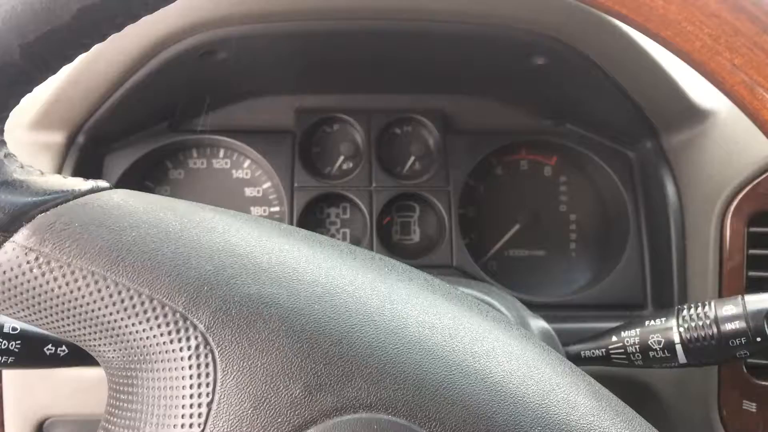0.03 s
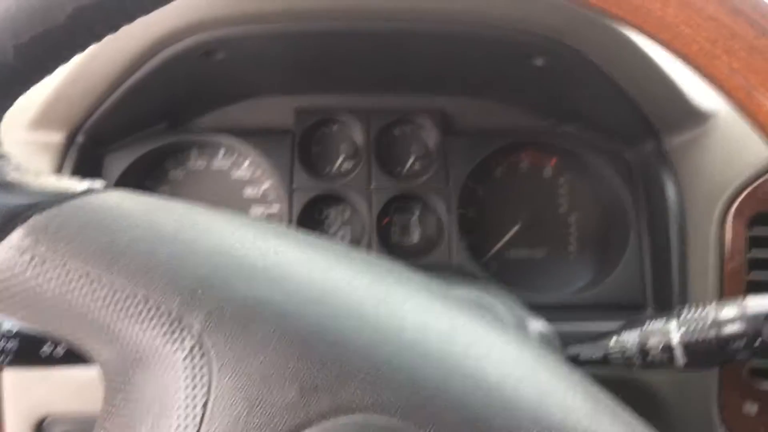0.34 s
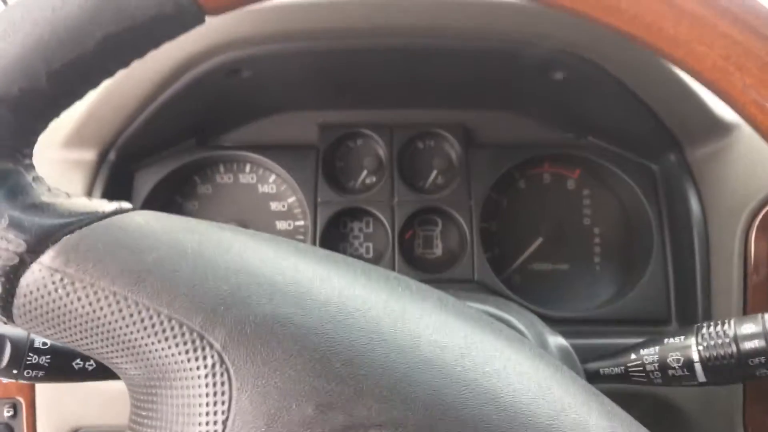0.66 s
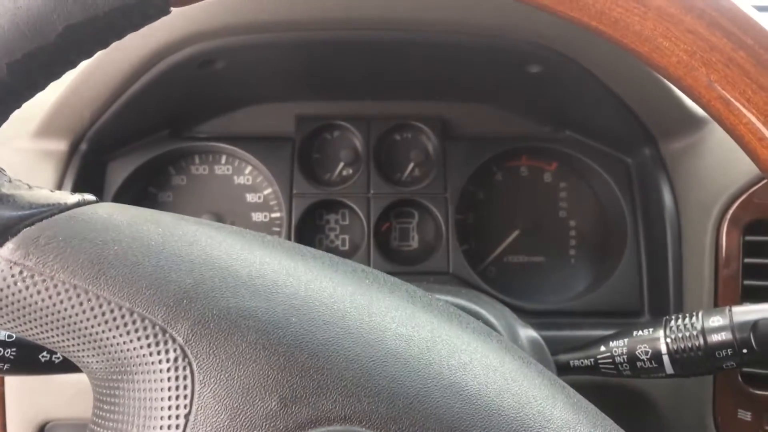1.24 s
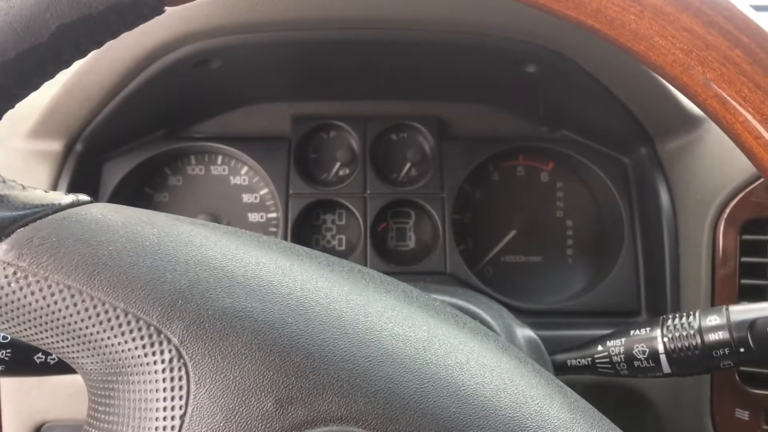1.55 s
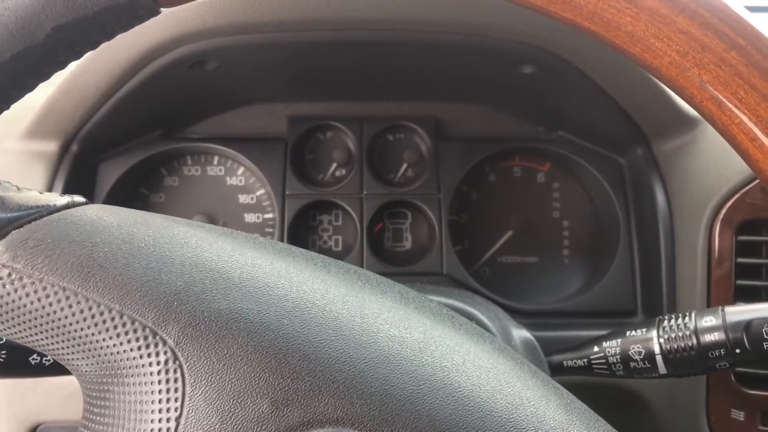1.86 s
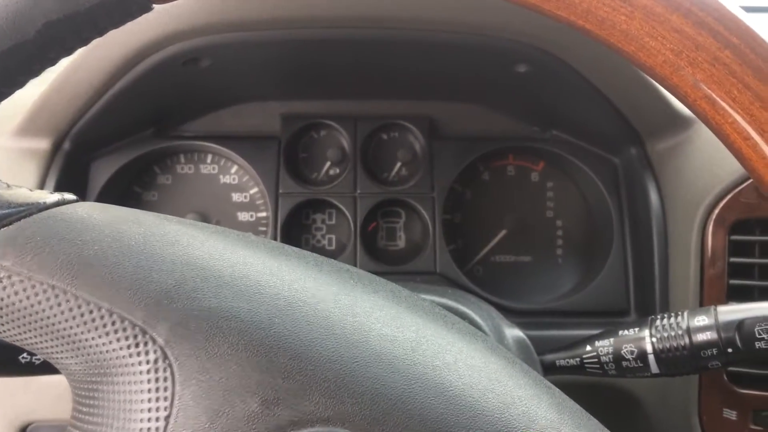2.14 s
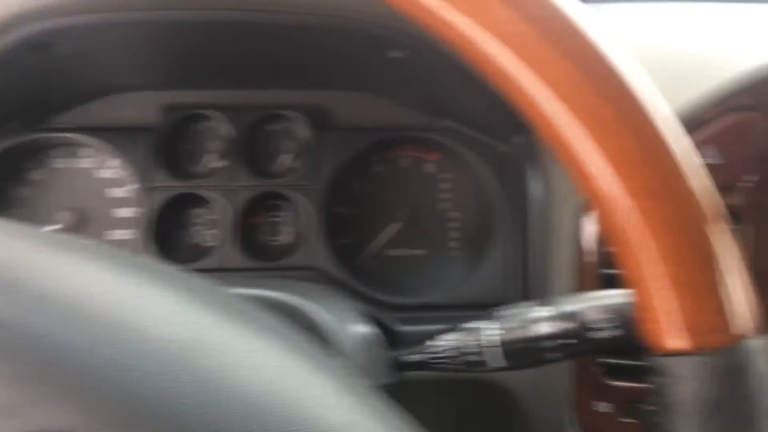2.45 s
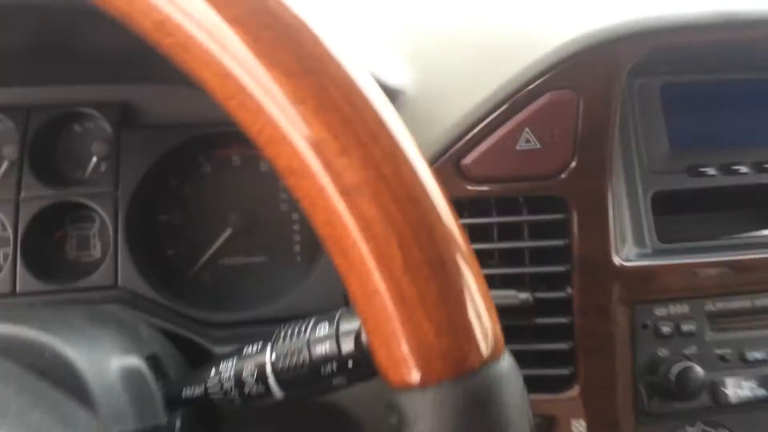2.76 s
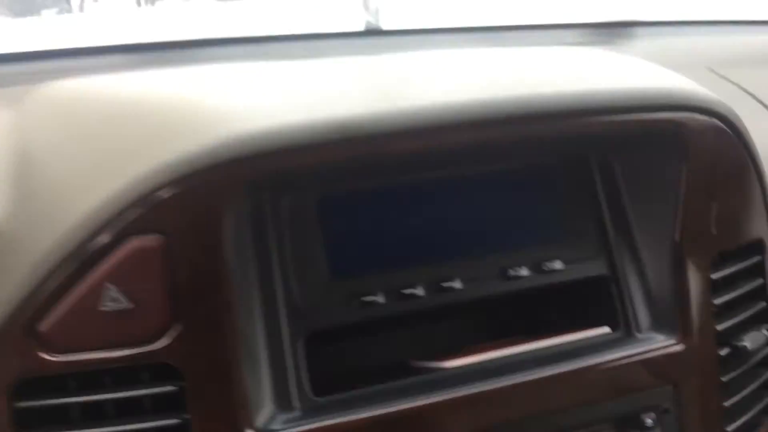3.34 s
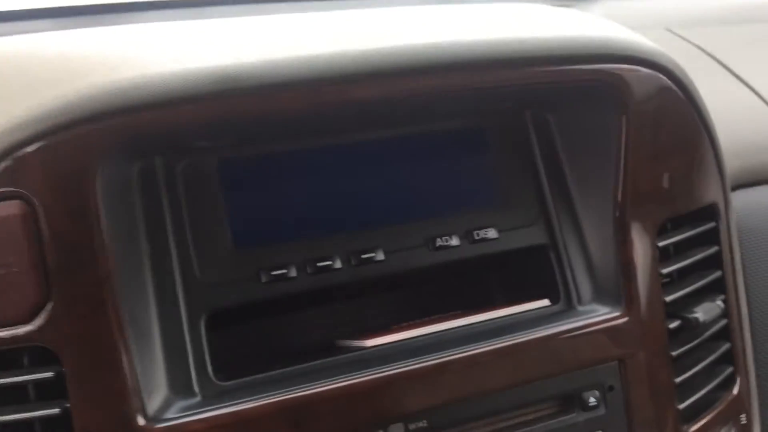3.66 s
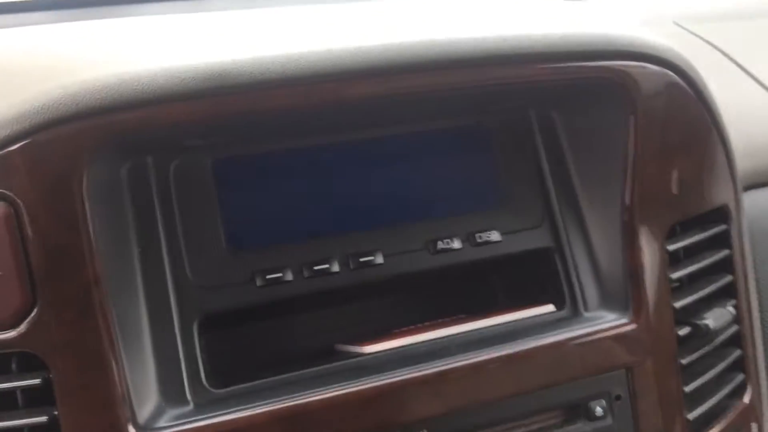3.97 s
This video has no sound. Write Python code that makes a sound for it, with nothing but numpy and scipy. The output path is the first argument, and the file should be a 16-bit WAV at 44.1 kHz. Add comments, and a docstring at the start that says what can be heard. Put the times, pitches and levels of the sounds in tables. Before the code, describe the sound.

A low, throbbing rumble fills a parked car throughout, with soft hiss and faint whistles. A small dry snap comes at 0.5 seconds. From 2.8 seconds a hand shifts right at the microphone: dull bumps, a short rubbing squeak at 3.1, then sharp plastic clicks, rustle and rattle from 3.5. One loud hollow knock lands at 3.8, followed by a brief low hum and two tiny tinks.

```python
"""Inside a parked car, heard from a hand-held camera. From 0.12 s a throbbing low rumble and a soft,
airy hiss with faint whistles fill the cabin; one small dry snap comes early. From 2.8 s the hand
shifts on the camera, right at the microphone: dull bumps, a short rubbing squeak, a light rustle,
then sharp plastic clicks, a rattle and one loud hollow knock, ending in a low hum and two tiny tinks.
The padded cabin answers each handling sound briefly."""
import sys
import numpy as np
from scipy import signal
from scipy.fft import rfft, irfft, next_fast_len
from scipy.io import wavfile
from scipy.ndimage import uniform_filter1d, map_coordinates

SR = 44100
rng = np.random.default_rng(int(sys.argv[2]) if len(sys.argv) > 2 else 0)


def to_wav(sig):
    """Store sig (one row per channel, or 1-D mono) as 16-bit WAV at the path in sys.argv[1].

    Samples outside -1..1 are clipped; the rate is SR.
    """
    pcm = np.clip(np.atleast_2d(sig), -1, 1) * 32767
    pcm = np.round(pcm).astype(np.int16)
    wavfile.write(sys.argv[1], SR, pcm.T)  # frames by channels


N = 176400

# spectrum of a hard contact on plastic: frequency_hz, gain_db
CLICK_COLOUR = [(200, -11), (400, -3.5), (650, -1.5), (1200, 0), (1600, 2), (1900, -2.5), (2300, -1.5),
                (2900, -2.5), (3400, -3.5), (4000, -8), (5500, -6.5), (7100, -7.5), (8000, -8.5),
                (8600, -9.5), (10000, -14.5), (13200, -16.5), (15000, -25)]


def amp(db):
    return 10 ** (np.asarray(db) / 20)


def unit(x):
    return x / np.sqrt(np.mean(x ** 2) + 1e-20)


def clock():
    return np.arange(N) / SR


def curves(rows):
    """One value per sample for each column after the time."""
    times, *columns = np.transpose(rows)
    return [np.interp(clock(), times, column) for column in columns]


def wobble(rate_hz):
    """A smooth random curve with rate_hz knots a second."""
    return map_coordinates(rng.standard_normal(int(N * rate_hz / SR) + 4), [clock() * rate_hz])


def swells(rows):
    """A sum of bell-shaped swells from rows of centre_s, half_length_s, level_db."""
    return sum(amp(db) * np.exp(-.5 * ((clock() - s) / half) ** 2) for s, half, db in rows)


def wavering(hz, wander, rate_hz):
    """A tone of rms 1 whose pitch wanders by a share of itself."""
    pitch_hz = hz * (1 + wander * wobble(rate_hz))
    return unit(np.sin(2 * np.pi * (rng.random() + np.cumsum(pitch_hz) / SR)))


def filtered(x, response):
    """x shaped by a gain that depends on frequency."""
    size = next_fast_len(N + SR // 2)
    return irfft(rfft(x, size) * response(np.fft.rfftfreq(size, 1 / SR)), size)[:N]


def noise(colour, tilt_db=0):
    """Noise of rms 1 from rows of frequency_hz, gain_db, tilted by tilt_db per octave."""
    hz, db = np.transpose(colour)
    tilted_db = db + tilt_db * np.log2(hz / hz[0])
    response = lambda f: amp(np.interp(np.log(f + 1), np.log(hz + 1), tilted_db))
    return unit(filtered(rng.standard_normal(N), response))


def resonance(hz, width_hz):
    """Noise of rms 1 in one steep-sided resonance."""
    return unit(filtered(rng.standard_normal(N), lambda f: 1 / (1 + ((f - hz) / width_hz * 2) ** 2)))


def patchy(x, depth_db):
    """Slow random patches of gain over frequency and time."""
    spectra = signal.stft(x, nperseg=1024)[2]
    patches = uniform_filter1d(rng.standard_normal(spectra.shape), size=4, axis=0)
    patches = unit(uniform_filter1d(patches, size=9, axis=1))
    return unit(signal.istft(spectra * amp(depth_db * patches), nperseg=1024)[1][:N])


def decay(start_s, t60_s, attack_s=0.00093):
    """A fast rise, then an exponential fall."""
    t = np.maximum(clock() - start_s, 0)
    return np.exp(-np.log(1000) * t / t60_s) * (1 - np.exp(-t / attack_s))


def crack(start_s, hold_s, t60_s):
    """A sudden rise, a brief hold and a fast fall."""
    t = clock() - start_s
    return np.clip(t / 0.00032, 0, 1) * np.exp(-np.log(1000) * np.maximum(t - hold_s, 0) / t60_s)


def ring(start_s, modes, attack_s):
    """Struck, damped modes of alternating sign, each slightly random in level."""
    t = np.arange(SR // 2) / SR
    tone = 0
    for k, (hz, db, t60_s) in enumerate(modes):
        envelope = amp(db + rng.normal(0, 1)) * np.exp(-np.log(1000) * t / t60_s)
        tone += (-1) ** k * envelope * np.sin(2 * np.pi * hz * t)
    return np.pad(tone * (1 - np.exp(-t / attack_s)), (round(start_s * SR), N))[:N]


def rumble():
    """The cabin throbs on one low resonance over a broad rumble."""
    # throbs of the cabin: centre_s, half_length_s, level_db
    throbs = [(0.235, 0.017, -48), (0.37, 0.011, -40.5), (0.45, 0.027, -45), (0.555, .03, -39),
              (0.71, 0.011, -41), (0.762, .017, -43), (1.01, 0.021, -37.5), (1.1, .018, -49),
              (1.19, 0.011, -42.5), (1.385, 0.015, -42.5), (1.6, 0.033, -45), (1.665, 0.011, -38),
              (1.76, 0.016, -42), (1.88, 0.016, -46), (1.94, 0.01, -40.5), (2.115, .017, -40.5),
              (2.23, 0.015, -38), (2.43, 0.011, -42), (2.94, 0.015, -37.5), (3.24, 0.032, -42),
              (3.44, .018, -40), (3.6, 0.039, -44.5), (3.78, 0.017, -40)]
    # course of the broad rumble: time_s, level_db
    levels = [(0.13, -49), (0.55, -45.5), (0.85, -48), (1.05, -47.5), (1.3, -49), (1.75, -48.5),
              (2.05, -48.5), (2.3, -48), (2.72, -52.5), (2.88, -45), (3.3, -47), (3.6, -49.5), (4.0, -44.5)]
    # its spectrum: frequency_hz, gain_db
    colour = [(22, -35), (32, -10), (42, -0.5), (55, -0.5), (68, -2), (85, -7.5), (110, -10), (150, -12.5),
              (195, -16), (235, -21.5), (280, -25), (340, -30.5), (420, -33.5), (550, -75)]
    level_db, = curves(levels)
    boom = (amp(-54) + swells(throbs)) * wavering(hz=48.25, wander=0.0792, rate_hz=14)
    return boom + amp(level_db + wobble(20)) * noise(colour)


def hiss():
    """Airy, swirling hiss around the microphone; its treble and faint resonances come and go."""
    # course of the hiss: time_s, hiss_db, treble_db
    levels = [(.12, -52.5, -64), (.3, -52.5, -69), (.48, -53, -61.5), (.7, -52.5, -65.5), (1, -53.5, -70.5),
              (1.6, -54, -79), (2.1, -55.5, -69.5), (2.4, -54, -71), (2.65, -55.5, -67), (2.9, -54, -59),
              (3.25, -56.5, -63.5), (3.55, -57.5, -62), (4, -61.5, -68)]
    # spectra of the hiss and the treble above it: frequency_hz, gain_db
    hiss_colour = [(180, -27), (300, 0), (409, -8.5), (597, 0), (669, -8.5), (726, -5), (855, -6.5),
                   (1020, -1), (1310, -1.5), (1420, -0.5), (2250, -3.5), (2600, -3.5), (2820, -5),
                   (3170, -7), (4390, -12.5), (6300, -14.5), (15000, -31)]
    treble_colour = [(1500, -45), (3500, -5.5), (6000, -1.5), (9000, -6), (15000, -14)]
    # faint bands in the cabin noise, the last a low rumble as the hand shifts on the camera: centre_hz,
    # width_hz, level_db, start_s, end_s
    bands = [(4000, 1300, -66, .1, .78), (1380, 550, -62.5, .68, 1.14), (1040, 110, -66, 1.15, 1.8),
             (1470, 550, -65, 2.15, 2.6), (138, 7, -62, 1.25, 2.65), (203, 14, -65, 1.1, 2.65),
             (98, 34, -52.5, 2.76, 3.6)]
    hiss_db, treble_db = curves(levels)
    air = amp(hiss_db + 0.52 * wobble(13)) * patchy(noise(hiss_colour), depth_db=1.7)
    air += amp(treble_db + 1.25 * wobble(60)) * noise(treble_colour)
    for hz, width_hz, db, start_s, end_s in bands:
        fade = np.clip(np.minimum(clock() - start_s, end_s - clock()) / 0.04, 0, 1)
        air += amp(db + 1.4 * wobble(16)) * fade * resonance(hz, width_hz)
    return air


def whistles():
    """A narrow band of hiss swells in short bursts and wavers in pitch."""
    # whistling swells: centre_s, half_length_s, pitch_hz, level_db
    bursts = [(.185, .027, 2620, -55), (.35, .035, 2560, -59.5), (.515, .03, 2540, -57),
              (.59, .025, 2600, -61.5), (1.41, .05, 2560, -62), (1.55, .06, 2620, -61),
              (1.72, .04, 2660, -60.5), (1.88, .05, 2630, -61), (2.13, .04, 2590, -65),
              (2.75, .045, 2560, -61.5)]
    s, half, hz, db = np.transpose(bursts)
    shift_hz = np.interp(clock(), s, hz) - hz[0] + 50 * wobble(35)
    band = signal.hilbert(resonance(hz[0], width_hz=130))
    gliding = band * np.exp(2j * np.pi * np.cumsum(shift_hz) / SR)
    return swells(zip(s, half, db)) * gliding.real


def snap():
    """One small dry snap: a burst of noise that dies at once."""
    # spectrum of the snap: frequency_hz, gain_db
    colour = [(300, 3), (1500, 0), (4000, -3), (6000, 2), (7500, -16), (10000, -22), (15000, -28)]
    return amp(-38.5) * decay(start_s=.4517, t60_s=0.013, attack_s=.0002) * noise(colour)


def bumps():
    """The hand bumps the camera: each time a soft tap with a low thud."""
    # bumps of the hand: start_s, thud_db, tap_db
    hits = [(2.8491, -27.5, -33.5), (3.3667, -31, -33), (3.7496, -35, -30.5), (3.7612, -31.5, -48),
            (3.864, -36.5, -57)]
    # modes of the thud: pitch_hz, gain_db, t60_s
    modes = [(62, -10, .1), (111, 5.5, 0.075), (190, -2.5, 0.07), (340, -19, 0.09)]
    # spectrum of the tap: frequency_hz, gain_db
    colour = [(150, -26), (400, 0), (700, -13.5), (1200, 4), (1700, -15.5), (2600, -9.5), (3400, -23),
              (6000, -25), (15000, -44)]
    return sum(amp(thud_db) * ring(s, modes, attack_s=0.0056)
               + amp(tap_db) * decay(s, t60_s=0.049) * noise(colour)
               for s, thud_db, tap_db in hits)


def squeak():
    """A rubbing contact catches, then sticks and slips: a rough gliding tone in friction noise."""
    # course of the squeak: time_s, pitch_hz, level_db
    glide = [(3.074, 590, -69), (3.0765, 610, -39), (3.086, 633, -38.5), (3.097, 747, -42),
             (3.111, 954, -45), (3.12, 924, -44), (3.135, 727, -54), (3.15, 700, -54), (3.165, 690, -67)]
    # spectrum of the friction: frequency_hz, gain_db
    colour = [(200, -18), (550, 7.5), (900, -2), (1300, 5), (1650, -13), (2150, -2.5), (3000, -20),
              (7000, -21.5), (15000, -31)]
    hz, db = curves(glide)
    phase = 2 * np.pi * np.cumsum(hz * (1 + 0.032 * wobble(400))) / SR
    tone = unit(np.sin(phase) + 0.17 * np.sin(2 * phase))
    rubbing = (clock() > glide[0][0]) & (clock() < glide[-1][0])
    catch = amp(-38.5) * decay(start_s=3.0752, t60_s=0.038) * noise(CLICK_COLOUR)
    return catch + amp(db) * rubbing * (amp(-1) * tone + amp(1.5) * noise(colour))


def rustles():
    """The grip slides in short, grainy strokes close to the microphone."""
    # slides of the grip: centre_s, half_length_s, level_db
    slides = [(3.077, 0.013, -49.5), (3.542, 0.003, -41), (3.79, 0.017, -44), (3.879, 0.027, -50.5),
              (3.947, 0.0049, -51), (3.967, 0.0076, -51.5)]
    # their spectrum: frequency_hz, gain_db
    colour = [(300, 7.5), (1000, 5.5), (2200, 1), (4000, -0.5), (7500, -2.5), (12000, -8), (15000, -13)]
    return swells(slides) * unit(noise(colour) * amp(1.9 * wobble(500)))


def ticks():
    """The plastic creaks in small ticks, each a noise burst at its own pitch."""
    # creaking ticks: start_s, level_db, pitch_ratio
    hits = [(3.4505, -35.5, 0.98), (3.4608, -40.5, 0.98), (3.631, -39, 0.73), (3.818, -42, 1.1),
            (3.8222, -38.5, 1.05), (3.8486, -38, 1.07), (3.870, -38.5, 1.14), (3.886, -46, 1.1)]
    # spectrum at a pitch ratio of 1: frequency_hz, gain_db
    colour = [(400, -12), (1500, -9), (2600, -7.5), (3150, 6.5), (3800, -6.5), (4800, -11.5), (7000, -15),
              (15000, -27)]
    return sum(amp(db) * decay(s, t60_s=0.036, attack_s=0.00012)
               * noise([(ratio * hz, gain_db) for hz, gain_db in colour])
               for s, db, ratio in hits)


def clicks():
    """Plastic snaps sharply: a hard crack, a dense tail and briefly ringing modes."""
    # sharp clicks: start_s, level_db, tilt_db_per_octave, hold_s, tail_gain_db, ring_gain_db
    hits = [(3.5439, -31.5, -0.1, 0.0065, -3.5, -8.5), (3.6468, -27, 1.7, 0.0026, -2, -4.5),
            (3.6859, -40, 2.5, .002, 2, -18), (3.691, -26, 2.5, 0.0028, -1.5, -3),
            (3.7970, -35, 1, 0.006, -6, -12)]
    # modes of the plastic: pitch_hz, gain_db, t60_s
    modes = [(937, -6, .1), (1236, -9, .05), (2310, -2, .045), (2700, 0, .028), (2870, -1, .028),
             (3300, -4, .022), (5560, -8, .035), (7030, -3, .04), (7730, -9, .03), (10600, -10, .04),
             (13300, -12, .045)]
    out = np.zeros(N)
    for s, db, tilt_db, hold_s, tail_db, ring_db in hits:
        envelope = np.maximum(crack(s, hold_s, t60_s=0.011), amp(tail_db) * decay(s, t60_s=0.064))
        burst = envelope * noise(CLICK_COLOUR, tilt_db)
        out += amp(db) * (burst + amp(ring_db) * ring(s, modes, attack_s=0.00066))
    return out


def rattles():
    """The camera's shell rattles with a woody body between the blows and creaks as it settles."""
    # rattles of the shell: centre_s, half_length_s, level_db
    shakes = [(3.712, 0.011, -49), (3.736, .005, -45.5), (3.758, 0.0057, -45), (3.787, 0.0056, -46),
              (3.826, .005, -44.5), (3.865, .022, -57)]
    # their spectrum: frequency_hz, gain_db
    colour = [(200, -7), (350, -0.5), (650, 0), (900, -11), (1200, 1.5), (1600, -8), (2200, -12),
              (4000, -26)]
    # dull creaks of the plastic: centre_s, half_length_s, pitch_hz, level_db
    creaks = [(3.71, .008, 950, -48), (3.869, .008, 524, -48), (3.887, 0.0035, 1160, -54),
              (3.946, 0.011, 1020, -50.5)]
    body = swells(shakes) * unit(noise(colour) * amp(2.7 * wobble(250)))
    return body + sum(swells([(s, half, db)]) * wavering(hz, wander=.035, rate_hz=300)
                      for s, half, hz, db in creaks)


def knocks():
    """Two blows ring the hollow plastic shell: a faint, duller one, then a loud one."""
    # blows on the shell: start_s, level_db, tilt_db_per_octave
    blows = [(3.7272, -38.5, -1), (3.8019, -20, 0)]
    # modes of the shell: pitch_hz, gain_db, t60_s
    modes = [(490, -5.5, .06), (620, 5.5, 0.035), (760, 5, 0.034), (1025, 3, 0.062), (1178, 4, .036),
             (1335, 1, 0.051), (1757, -2.5, 0.049), (2135, 1, .04), (2800, -3, 0.048)]
    # spectrum of the impact: frequency_hz, gain_db
    colour = [(150, -9), (320, -9), (450, -5), (720, 0.5), (1100, 5), (1700, -6.5), (2850, -5.5),
              (6000, -17), (7200, -15), (15000, -44)]
    pivot_hz, attack_s = modes[3][0], .0005
    out = np.zeros(N)
    for s, db, tilt_db in blows:
        tilted = [(hz, gain_db + tilt_db * np.log2(hz / pivot_hz), t60) for hz, gain_db, t60 in modes]
        shell = amp(-8) * ring(s, tilted, attack_s)
        impact = amp(-3) * decay(s, t60_s=0.052, attack_s=attack_s) * noise(colour, tilt_db)
        out += amp(db) * (shell + impact)
    return out


def hum():
    """A soft, uneven low ring lingers after the last bump as the grip settles."""
    # onset of the hum: start_s, level_db
    onsets = [(3.868, -40.5)]
    # its modes: pitch_hz, gain_db, t60_s
    modes = [(110.6, -1.5, 0.69), (184, -1.5, 0.85), (340, -12, 0.3)]
    waver = amp(2 * wobble(50))
    return waver * sum(amp(db) * ring(s, modes, attack_s=0.0039) for s, db in onsets)


def tinks():
    """Tiny bright contacts: a short ring inside a fine scrape."""
    # light contacts: start_s, level_db
    hits = [(3.941, -44), (3.963, -44)]
    # their modes: pitch_hz, gain_db, t60_s
    modes = [(7050, -8, .03), (9300, -3, .04), (9650, -5, .03), (11500, -7, .04), (11950, -5, .045)]
    # spectrum of the scrape: frequency_hz, gain_db
    colour = [(3000, -20), (6500, -5), (8200, -10), (9500, 2), (10600, -4), (12000, 0), (15000, -16)]
    return sum(amp(db) * (ring(s, modes, attack_s=0.0018)
                          + amp(-4) * decay(s, t60_s=0.064, attack_s=.003) * noise(colour))
               for s, db in hits)


def cabin(x):
    """The short answer of the padded cabin, strongest in the bass."""
    reflections = noise([(100, -8), (2000, -16), (15000, -13.5)])  # frequency_hz, gain_db
    tail = (reflections * decay(start_s=0.0018, t60_s=0.075))[:SR // 2]
    return signal.fftconvolve(x, tail / np.linalg.norm(tail))[:N]


def scene():
    """At one microphone: the cabin's noise, the close handling and its reflections."""
    handling = snap() + bumps() + squeak() + rustles() + ticks() + clicks()
    handling += rattles() + knocks() + hum() + tinks()
    return (rumble() + hiss() + whistles() + handling + amp(-12.5) * cabin(handling))[None]


def record(dry):
    """The microphone opens after a moment and keeps nothing above its band limit."""
    open_s, top_hz = .12, 15500
    return filtered(dry[0] * (clock() > open_s), lambda hz: 1 / (1 + (hz / top_hz) ** 120))[None]


dry = scene()
out = record(dry)
to_wav(out)
```